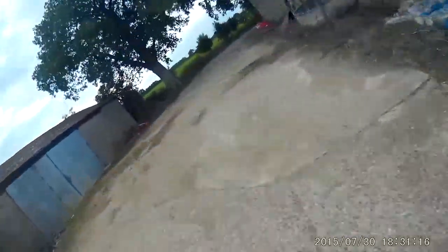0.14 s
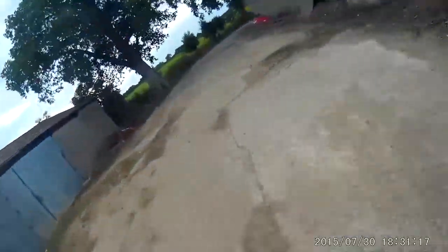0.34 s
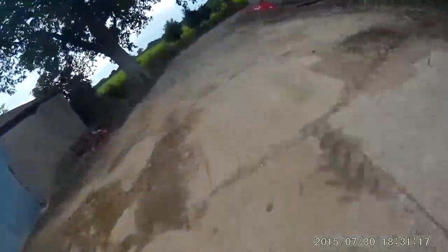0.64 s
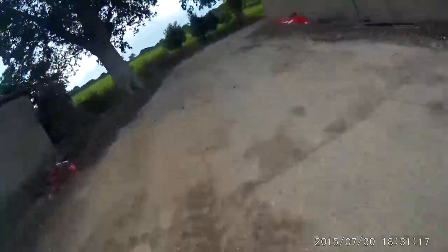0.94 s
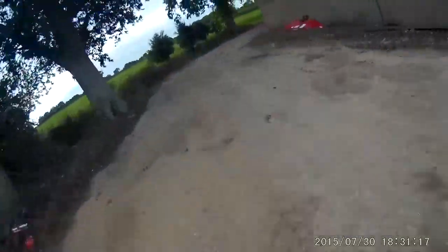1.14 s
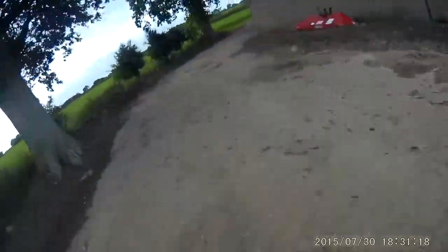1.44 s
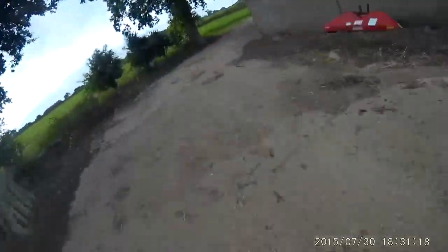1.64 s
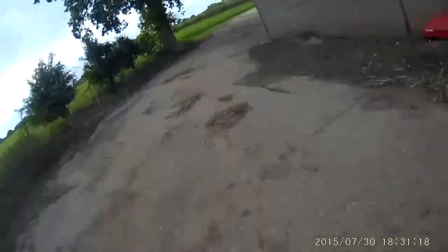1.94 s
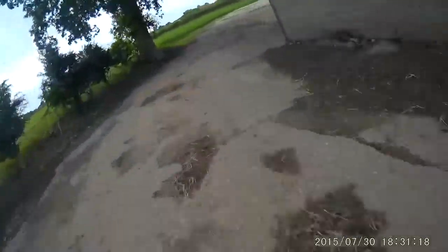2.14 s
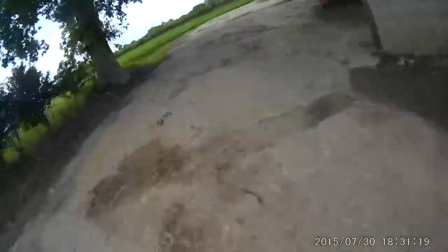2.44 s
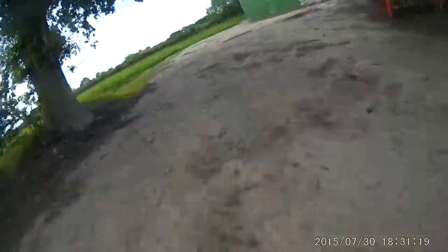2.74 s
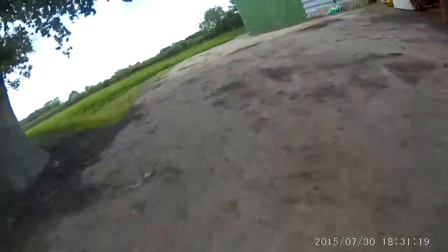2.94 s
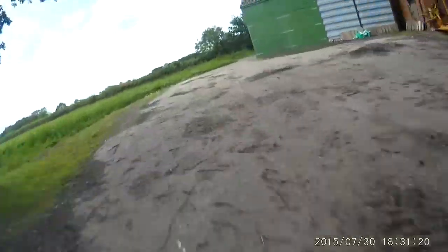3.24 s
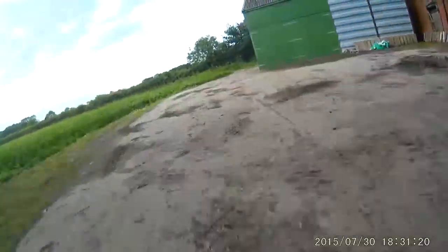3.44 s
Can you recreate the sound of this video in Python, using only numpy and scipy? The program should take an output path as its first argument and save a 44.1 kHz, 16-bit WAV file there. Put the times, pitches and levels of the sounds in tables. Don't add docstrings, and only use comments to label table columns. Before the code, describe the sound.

Onboard a racing drone in open air, four propellers drone and whine at slightly different pitches. A harsh rattle fades within a second; wash and wind ease, then strengthen towards the end. Close, gritty, dull-topped mono sound.

```python
import sys
import numpy as np
from scipy import signal
from scipy.fft import rfft, irfft, next_fast_len
from scipy.io import wavfile
from scipy.ndimage import uniform_filter1d, map_coordinates

SR = 44100
rng = np.random.default_rng(int(sys.argv[2]) if len(sys.argv) > 2 else 0)


def store_pcm(level_fs):
    pcm = np.round(np.clip(level_fs, -1, 1) * 32767).astype(np.int16)
    wavfile.write(sys.argv[1], SR, np.atleast_2d(pcm).T)


def field_ratio(decibels):
    return 10 ** (np.asarray(decibels, dtype=float) / 20)


N = 158760

# start_s, wash_db, airspeed_db
FLOW = [
    (0, -20.5, 2),
    (.05, -18.5, 2.5),
    (.4, -20.5, -0.5),
    (.8, -22, -1.5),
    (1.6, -20, -1.2),
    (2.2, -19.5, -0.5),
    (2.7, -18.5, 1),
    (3.05, -17.5, 3.5),
    (3.54, -17.5, 3),
    (3.6, -18.5, 2),
]


def unit(x):
    return x / np.sqrt(np.mean(x ** 2) + 1e-20)


def along(points, hz):
    f, v = np.transpose(points)
    return np.interp(np.log(hz + 1), np.log(f + 1), v)


def curves(rows):
    s, *cols = np.transpose(rows)
    return [np.interp(np.arange(N) / SR, s, c) for c in cols]


def wobble(rate_hz):
    return map_coordinates(rng.standard_normal(4000), [np.arange(N) * rate_hz / SR])


def rush(spectrum, patchy_db):
    z = signal.stft(rng.standard_normal(N), nperseg=512)[2]
    field = uniform_filter1d(rng.standard_normal(z.shape), 6, 0)
    field = uniform_filter1d(field, 10, 1)
    x = signal.istft(z * field_ratio(patchy_db * unit(field)), nperseg=512)[1][:N]
    m = next_fast_len(N + 8192)
    closed = [(spectrum[0][0] / 2, -80), *spectrum, (spectrum[-1][0] * 1.3, -80)]
    gain = field_ratio(along(closed, np.fft.rfftfreq(m, 1 / SR)))
    return unit(irfft(rfft(x, m) * gain, m)[:N])


def wind():
    # freq_hz, density_db_per_hz
    buffet = [(15, -16), (30, -5), (60, -4), (120, -3), (250, -3.5), (500, -5)]
    speed_db = curves(FLOW)[1]
    gusts = unit(field_ratio(0.47 * wobble(5.8)) * rush(buffet, patchy_db=1.7))
    return field_ratio(-29 + 1.45 * speed_db) * gusts


def prop_wash(tones):
    # freq_hz, density_db_per_hz
    body_spectrum = [(150, -8), (300, -12), (600, 0), (1000, -3), (1500, 2), (2000, -0.5), (2500, -9),
                     (3500, -24)]
    # freq_hz, density_db_per_hz
    hiss_spectrum = [(2300, -17.5), (2950, -1.5), (4150, -5.5), (4400, 1.5), (4900, 2), (5450, 0),
                     (5900, -9.5), (7250, -3.5)]
    # freq_hz, density_db_per_hz
    fizz_spectrum = [(7400, -3), (7900, -2), (9000, -4), (11000, -6), (13000, -11), (14800, -11.5),
                     (16000, -18)]
    wash_db, speed_db = curves(FLOW)
    wash_db = wash_db - wash_db.mean() + 0.2 * wobble(6) + 0.4 * wobble(40)
    chop_db = 0.7 * unit(np.gradient(tones))
    body = unit(field_ratio(chop_db / 4) * rush(body_spectrum, patchy_db=0.0))
    hiss = unit(field_ratio(chop_db + 0.75 * wobble(200)) * rush(hiss_spectrum, patchy_db=0.36))
    fizz = unit(field_ratio(chop_db) * rush(fizz_spectrum, patchy_db=1.7))
    body *= field_ratio(-18 + 0.92 * wash_db)
    hiss *= field_ratio(-22.5 + wash_db)
    fizz *= field_ratio(-31 + 0.48 * wash_db + speed_db)
    return body + hiss + fizz


def mount_chatter(tones):
    # start_s, level_db
    chatter_level = [
        (0, -26),
        (.05, -20.5),
        (.4, -22),
        (.65, -26),
        (.9, -33),
        (2.5, -33),
        (2.8, -30),
        (3.6, -30),
    ]
    # mode_hz, width_hz, level_db
    mount = [(1600, 200, 0), (2030, 250, 1), (3000, 450, -6), (7200, 450, -8)]
    gap, grit = 1.45, 0.5
    swing = np.gradient(tones)
    swing = swing / np.sqrt(np.abs(uniform_filter1d(swing ** 2, size=8000)))
    touch = np.maximum(swing - gap, 0) * (1 + grit * rng.standard_normal(N))
    m = next_fast_len(N + 8192)
    f = np.fft.rfftfreq(m, 1 / SR)
    ring = 0
    for k, (mode_hz, width_hz, level_db) in enumerate(mount):
        mode = 1j * f * width_hz / (mode_hz ** 2 - f * f + 1j * f * width_hz)
        ring = ring + (-1) ** k * field_ratio(level_db) * mode
    highpass = (1j * f / (1j * f + 1300)) ** 4
    knocks = unit(irfft(rfft(touch, m) * ring * highpass, m)[:N])
    return field_ratio(curves(chatter_level)[0]) * knocks


def rotor(blade_hz, tone_db, overtones_db):
    # freq_hz, gain_db
    frame_response = [(1200, 0), (1270, -1), (1345, -8), (1400, 0), (1450, 1), (1500, -1)]
    # freq_hz, gain_db
    arm_response = [(7250, 5), (7500, 1), (7800, -11), (8250, -10), (8350, -2), (9100, 0), (9400, -3),
                    (9520, -11)]
    hz = blade_hz + 1.5 * wobble(14)
    turn = 2 * np.pi * (np.cumsum(hz) / SR + rng.random()) + 0.03 * wobble(150)
    shaft_db, second_db, third_db, fourth_db, whine_db = overtones_db
    parts = [(0.5, shaft_db),
             (2, second_db),
             (3, third_db + along(frame_response, 3 * hz)),
             (4, fourth_db),
             (21, whine_db + along(arm_response, 21 * hz))]
    tone = field_ratio(tone_db + 1.02 + 0.5 * wobble(12)) * np.sin(turn)
    rest = 0
    for k, db in parts:
        shimmer = field_ratio(db + 2.2 * wobble(24.89))
        rest = rest + shimmer * np.sin(k * turn + 2 * np.pi * rng.random())
    return np.sqrt(2) * tone, np.sqrt(2) * rest


def four_rotors():
    # start_s, blade_hz, tone_db
    front_left = [(0.0, 352.1, -18), (0.08, 343.7, -20.5), (0.16, 356.7, -16), (0.48, 386.1, -14),
                  (0.64, 379.5, -14.5), (0.72, 394.3, -12), (1.0, 379.2, -15), (1.08, 383.7, -13),
                  (1.2, 370.7, -14.9), (1.24, 383.7, -13), (1.36, 379.8, -15), (1.68, 383.7, -12),
                  (1.88, 379.3, -13.5), (1.92, 385.8, -13), (2.0, 376.7, -13.7), (2.56, 382.8, -12.5),
                  (2.6, 390.2, -13), (3.6, 390.4, -10.5)]
    # start_s, blade_hz, tone_db
    front_right = [(0, 395, -12.5), (0.26, 396.6, -14), (0.38, 410.2, -13.5), (0.64, 420.6, -11.5),
                   (0.76, 435.7, -12.5), (1.08, 438.1, -11.7), (1.16, 445.8, -11), (1.68, 442.4, -11),
                   (1.72, 436.7, -10.8), (2.16, 447.6, -10.5), (2.28, 437.4, -10.3), (2.36, 447.4, -9.5),
                   (2.44, 432.7, -9.5), (2.68, 455.2, -10.0), (2.76, 446.2, -10), (2.96, 446, -8.5),
                   (3.2, 451.5, -9), (3.6, 451, -8)]
    # start_s, blade_hz, tone_db
    rear_left = [(0.0, 461.3, -20), (0.16, 448.6, -26), (0.76, 444.7, -32), (0.92, 467.6, -30),
                 (1.28, 482.3, -24), (1.56, 471, -26.8), (1.84, 483.4, -25), (1.88, 476.3, -24),
                 (2.04, 485.2, -22.5), (2.16, 476.8, -23), (2.64, 479.2, -23), (2.76, 499.1, -16),
                 (2.96, 489, -18.5), (3.08, 495, -16.5), (3.2, 496, -15), (3.28, 502.2, -22),
                 (3.44, 496.6, -20.5), (3.6, 502.6, -16)]
    # start_s, blade_hz
    rear_right = [(0.0, 453.4), (0.2, 444), (0.44, 431), (0.64, 439.9), (0.68, 435), (1.12, 426.3),
                  (1.16, 430.8), (1.28, 427.9), (1.76, 431), (1.92, 429), (2.0, 436.3), (2.08, 421.3),
                  (2.24, 437), (2.28, 426.1), (2.36, 435.5), (2.48, 432.3), (2.76, 447.9), (3.6, 451.9)]
    # shaft_db, second_db, third_db, fourth_db, whine_db
    overtone_levels = [
        (-40, -29, -44, -38, -37),
        (-36, -24, -28, -39, -36),
        (-44, -38, -25.5, -44, -38),
        (-33, -40, -42, -44, -35.5),
    ]
    rear_right_db = -35
    drives = [curves(front_left), curves(front_right), curves(rear_left),
              [*curves(rear_right), rear_right_db]]
    return np.sum([rotor(*d, o) for d, o in zip(drives, overtone_levels)], axis=0)


def scene():
    tones, overtones = four_rotors()
    mix = wind() + prop_wash(tones) + mount_chatter(tones) + tones + overtones
    return mix[None]


def soft_clip(x):
    top, hardness = 0.71, 9
    return x / (1 + np.abs(x / top) ** hardness) ** (1 / hardness)


def thin_treble(x):
    # freq_hz, threshold_db
    dropout = [(2000, -12), (7000, -8), (10000, -5.5), (13000, -3.2), (14500, -4.5), (15500, -2.8)]
    hz, _, z = signal.stft(x, SR, nperseg=2048)
    power = uniform_filter1d(np.abs(z) ** 2, size=6, axis=1)
    local = uniform_filter1d(power, size=40, axis=2)
    usual = np.sqrt(local * np.median(power, axis=2, keepdims=True))
    keep = power > usual * field_ratio(2 * along(dropout, hz))[:, None]
    keep = keep | (hz < 2000)[:, None]
    return signal.istft(z * keep, SR, nperseg=2048)[1][:, :N]


def band_limit(x):
    return signal.sosfilt(signal.butter(12, 15730, fs=SR, output="sos"), x)


def record(dry):
    x = soft_clip(dry)
    mix = thin_treble(x - x.mean())
    return band_limit(mix)


dry = scene()
out = record(dry)
store_pcm(out)
```